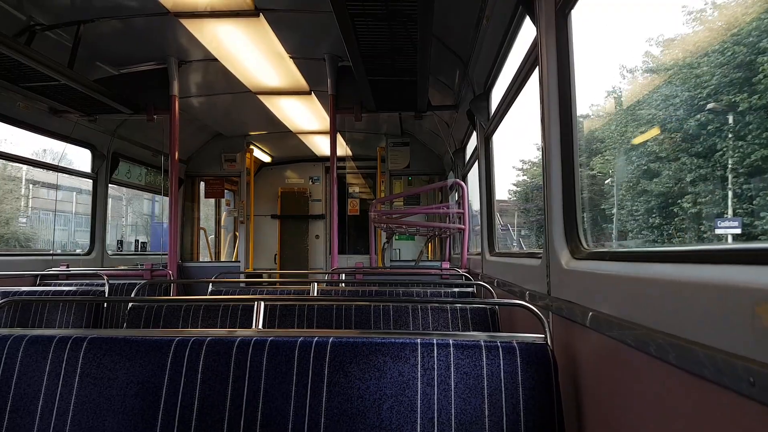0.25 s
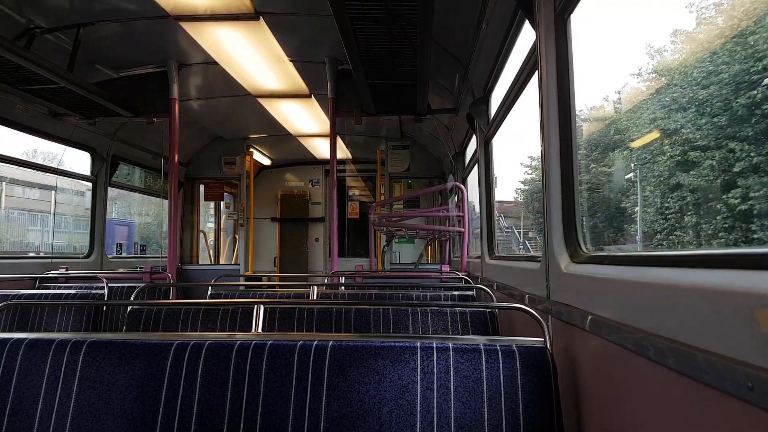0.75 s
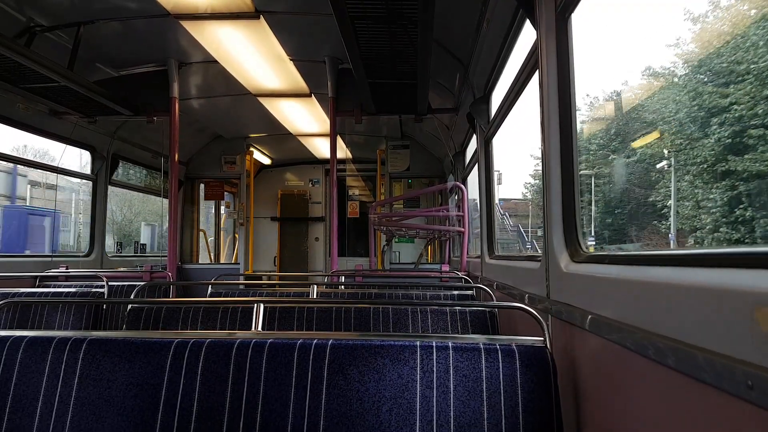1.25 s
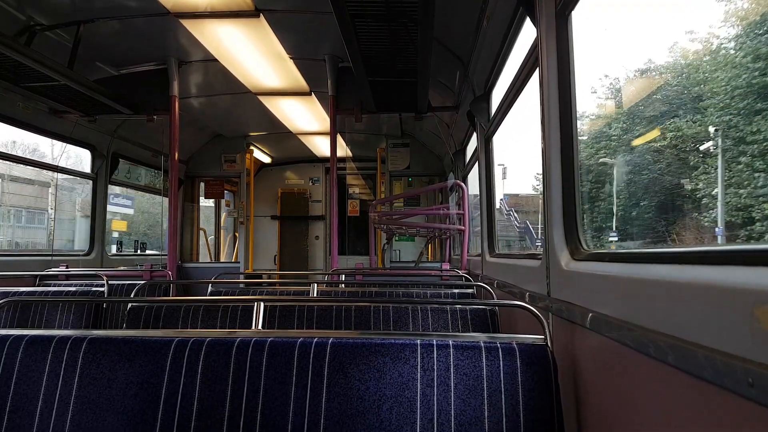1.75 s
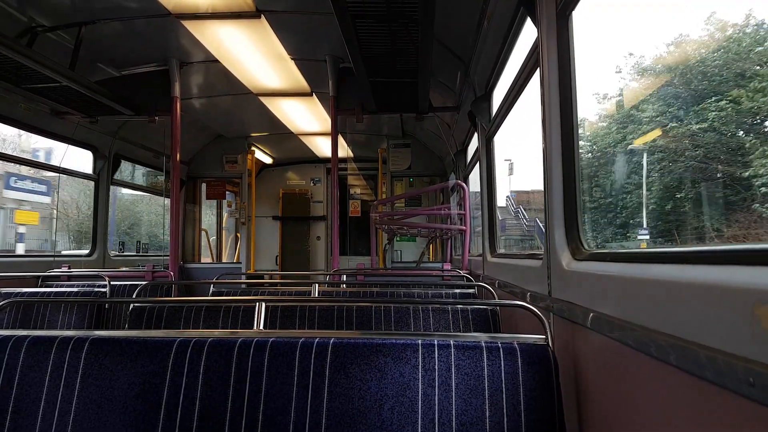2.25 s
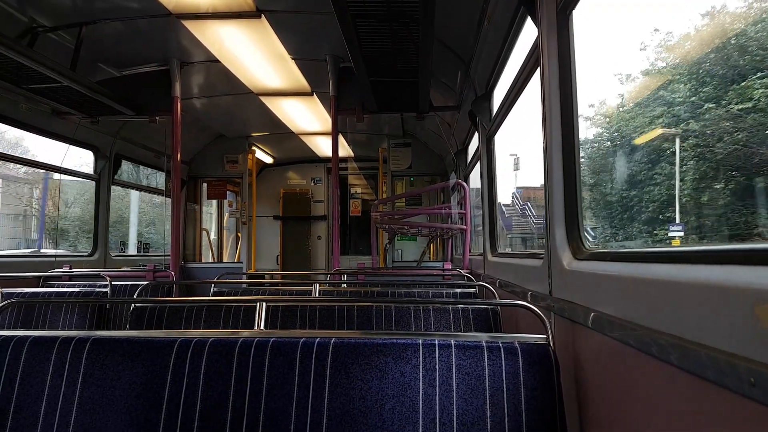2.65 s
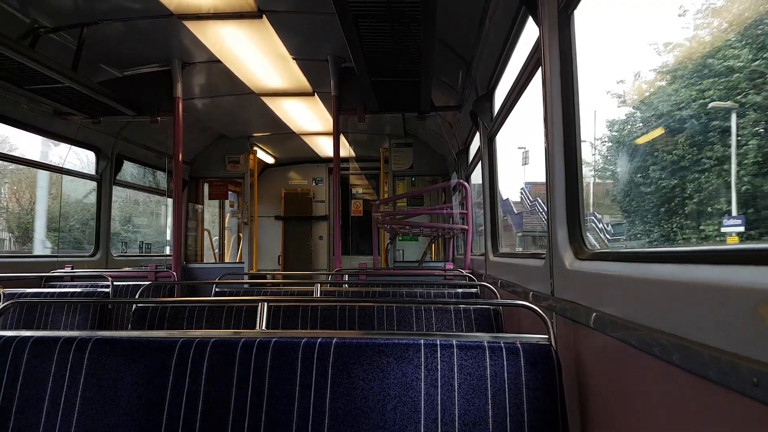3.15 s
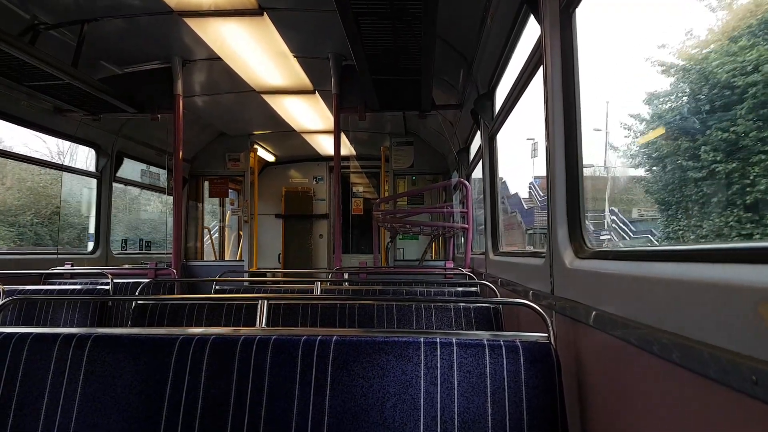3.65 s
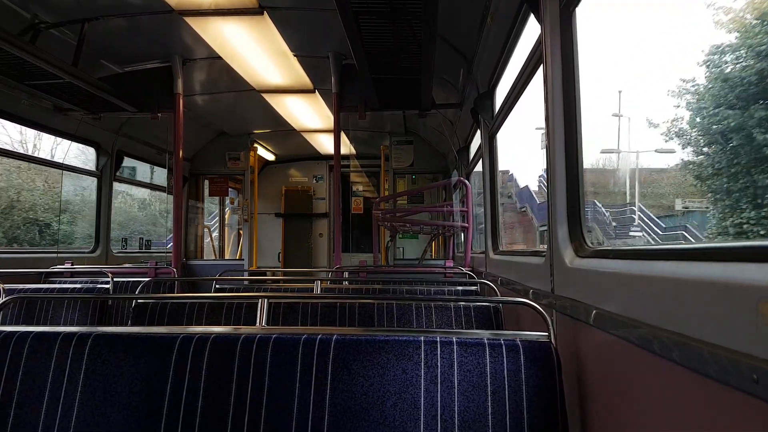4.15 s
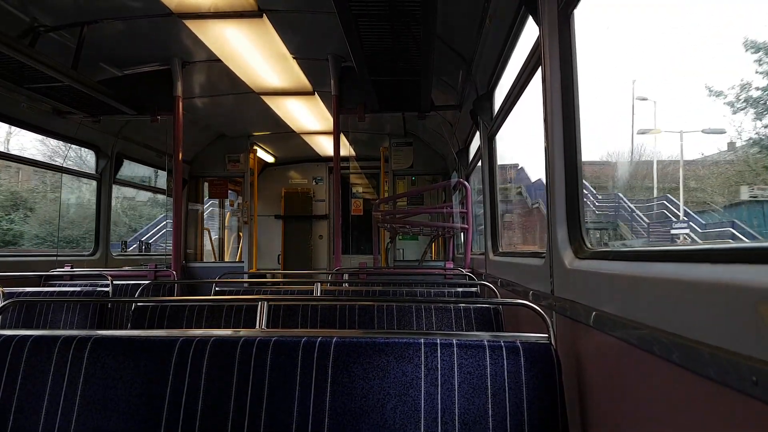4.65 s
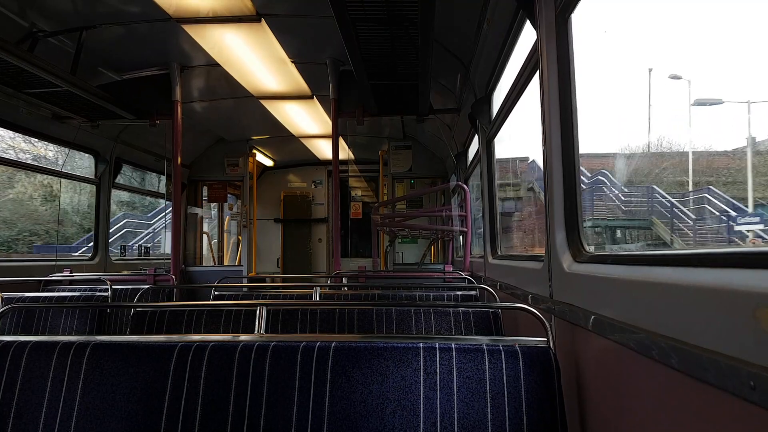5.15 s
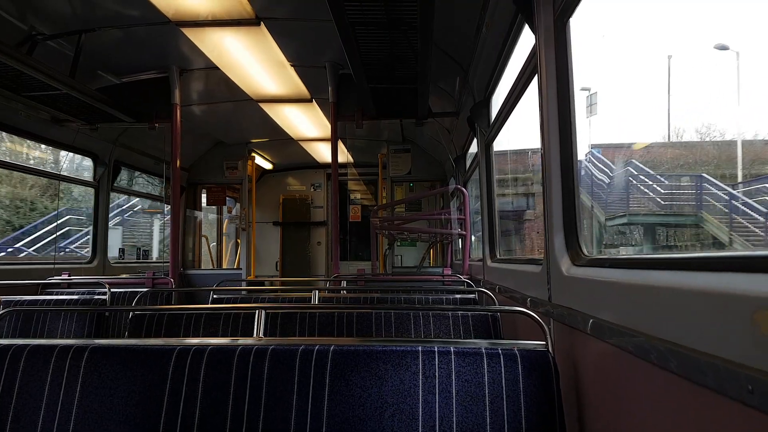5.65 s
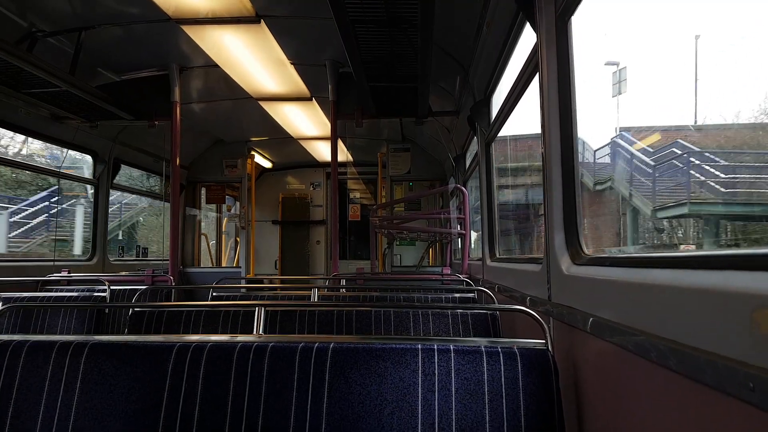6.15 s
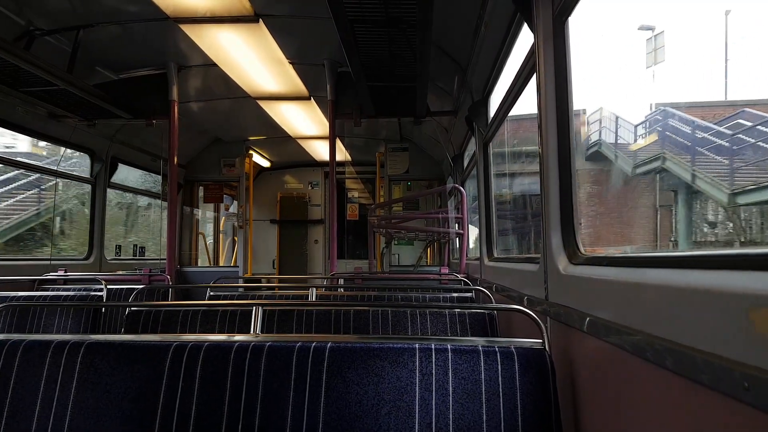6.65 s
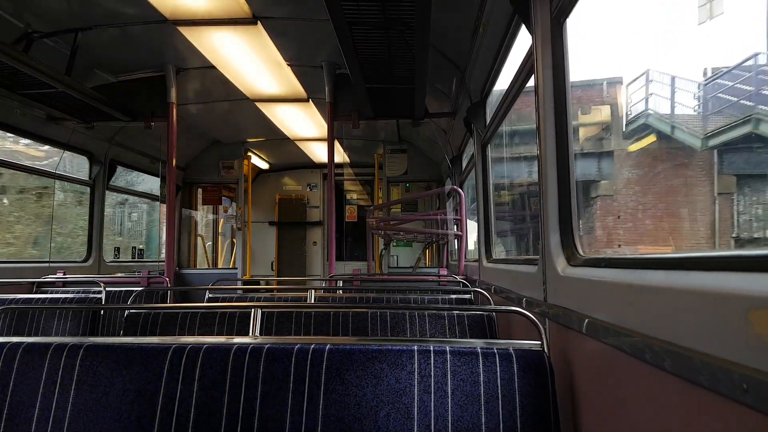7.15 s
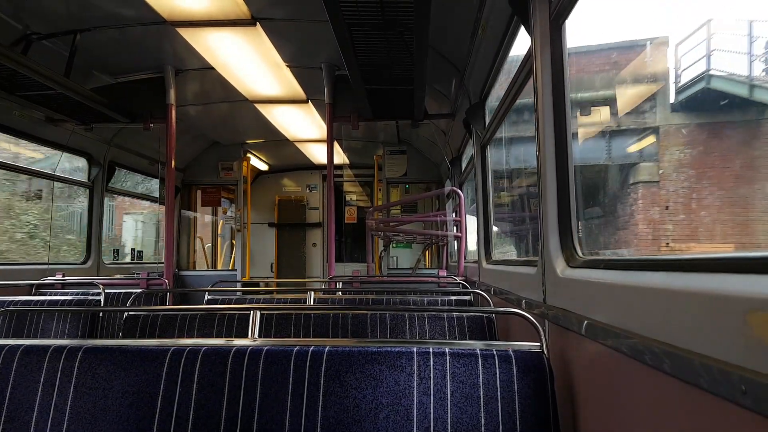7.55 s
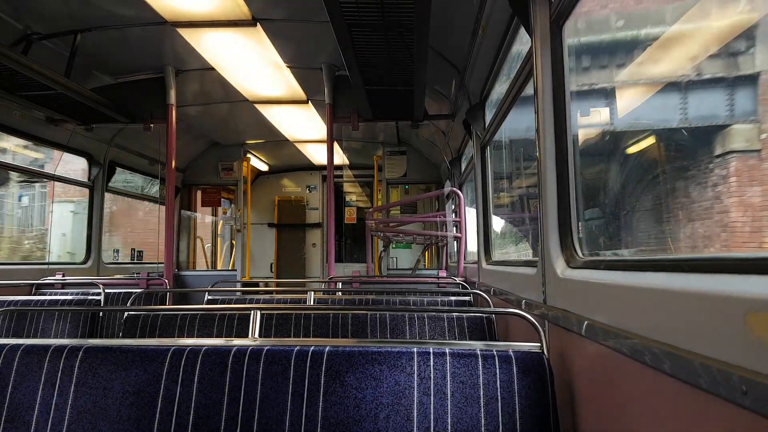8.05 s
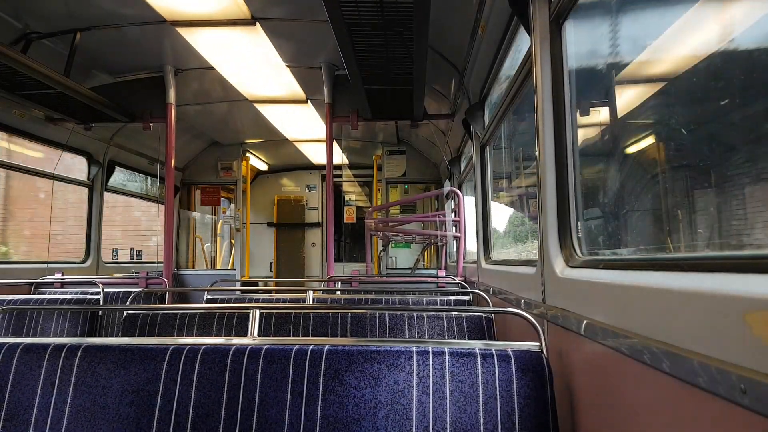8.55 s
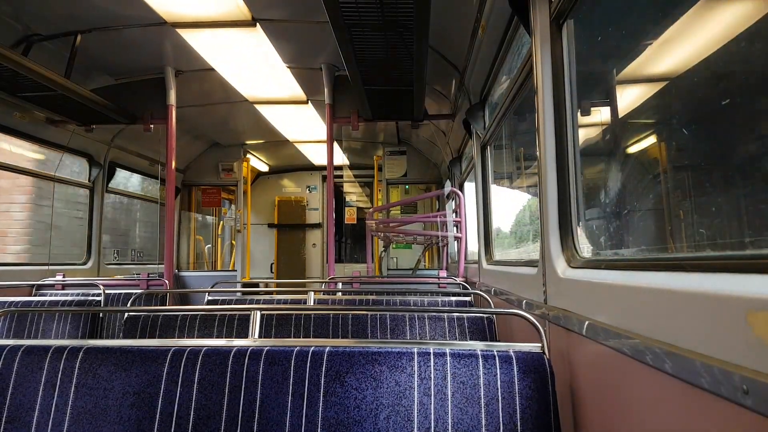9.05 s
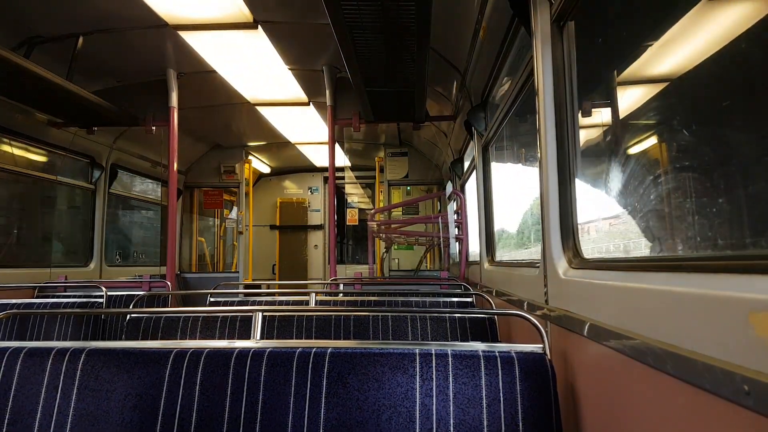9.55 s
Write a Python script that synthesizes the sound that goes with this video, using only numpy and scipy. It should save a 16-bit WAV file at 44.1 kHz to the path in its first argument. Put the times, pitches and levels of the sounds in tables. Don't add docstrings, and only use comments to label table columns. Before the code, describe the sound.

Inside an empty diesel railbus, heard in stereo from a seat. A deep engine boom near 85 Hz swells in during the first second and beats about nine times a second with another engine, above body rumble, fan hum and soft wheel roar. From 0.4 to 2 s a thin, high squeal pulses with the drive shaft. Small dips interrupt the boom around 2.3 and 2.6 s. At 3.3 s a sharp joint clank lands; engine pitch rises slightly and roar thickens. Light clatter at 4.2 s and a jolt at 4.55 s briefly sag the boom. Very high ticks run from 4 to 5.8 s, then upward chirps until 6.5 s, while panels whine. Clatter and louder roar come at 6.7 s. From 7.8 s, strongest after 8.5 s, a wheel flange sings in wavering beads near 2 kHz as the bridge encloses the train and roar grows to the end.

```python
import sys
import numpy as np
from scipy import signal
from scipy.io import wavfile
from scipy.ndimage import uniform_filter1d

SR = 44100
rng = np.random.default_rng(int(sys.argv[2]) if len(sys.argv) > 2 else 0)


def store_pcm(level_fs):
    pcm = np.round(np.clip(level_fs, -1, 1) * 32767).astype(np.int16)
    wavfile.write(sys.argv[1], SR, np.atleast_2d(pcm).T)


def convert_level_to_amplitude(level_db):
    exponent = np.asarray(level_db, float) / 20
    return 10 ** exponent


N = 431738


def clock():
    return np.arange(N) / SR


def read(points, hz):
    f, value = np.transpose(points)
    return np.interp(np.log(hz + 1), np.log(f + 1), value)


def curves(rows):
    s, *columns = np.transpose(rows)
    return [np.interp(clock(), s, column) for column in columns]


def evened(x):
    return x / np.sqrt(np.mean(np.abs(x) ** 2) + 1e-20)


def drift(rate):
    steps = rng.standard_normal(int(N / SR * 40) + 8)
    smooth = signal.lfilter([1], [1, -np.exp(-rate / 7)], steps)
    return evened(np.interp(clock() * 40, np.arange(len(steps)), smooth))


def swell(start, end, rise, fall, db=0):
    t = clock()
    fade_in = np.clip((t - start) / rise, 0, 1)
    fade_out = np.clip((end - t) / fall, 0, 1)
    return convert_level_to_amplitude(db) * (fade_in * fade_out) ** 1.4


def bells(rows, height=lambda v: v):
    return sum(height(v) * np.exp(-.5 * ((clock() - s) / w) ** 2) for s, v, w in rows)


def panned(x, pan_db):
    return x * convert_level_to_amplitude(np.multiply.outer([.5, -.5], pan_db * np.ones(N)))


def fuzzy(hz, width):
    r = np.exp(-np.pi * width / SR)
    z = rng.standard_normal((2, N)) + 1j * rng.standard_normal((2, N))
    z = signal.lfilter([1], [1, -2 * r, r * r], z)
    carrier = np.exp(2j * np.pi * np.cumsum(hz * np.ones(N)) / SR)
    return evened((z * carrier).real)


def wash(spectrum, size, patchy_db, flicker_db):
    # frequency in Hz, left-right likeness from -1 to 1.
    likeness = [(25, .97), (60, .997), (140, .99), (210, .97), (330, .7), (500, .55), (770, .36),
                (1200, -.14), (1800, -.15), (2700, 0), (15700, 0)]
    # frequency in Hz, left minus right in dB.
    lean = [(60, 1.5), (110, 1.5), (200, 0.5), (380, 0.0), (700, 1.5), (1290, 1.0), (2380, 0.5),
            (4400, 0.5), (8120, -1.0), (15000, 1.5)]
    frames, hz = 4 * N // size + 5, np.fft.rfftfreq(size, 1 / SR)
    a, b, c, d, patches = rng.standard_normal((frames, len(hz), 5)).T
    patches = uniform_filter1d(patches, size=10, axis=0)
    patches = evened(uniform_filter1d(patches, size=12, axis=1))
    flicker = evened(uniform_filter1d(rng.standard_normal(frames), size=5))
    same = np.clip(read(likeness, hz), -1, 1)[:, None]
    left = a + 1j * b
    right = same * left + np.sqrt(1 - same ** 2) * (c + 1j * d)
    f, _ = np.transpose(spectrum)
    level_db = read(spectrum, hz) - 60 * ((hz < f[0]) | (hz > f[-1]))
    z = np.array([left, right]) * convert_level_to_amplitude(level_db[:, None] + patchy_db * patches + flicker_db * flicker)
    z *= convert_level_to_amplitude(np.multiply.outer([.5, -.5], read(lean, hz)))[..., None]
    return evened(signal.istft(z, nperseg=size, noverlap=size * 3 // 4)[1][:, :N])


def shaft_turns():
    # time in seconds, speed in turns per second.
    shaft_speed = [(0.0, 7.88), (1.2, 8.62), (2.8, 10.44), (4.4, 11.56), (5.2, 12.47), (6.0, 13.26),
                   (7.0, 14.8), (8.0, 15.13), (9.0, 16.07), (9.79, 16.04)]
    return np.cumsum(curves(shaft_speed)[0]) / SR + .037


def touches(lobes):
    u = shaft_turns()
    return sum(g * np.exp(-.5 * (((u - at + .5) % 1 - .5) / w) ** 2) for at, w, g in lobes)


def struck(lobes, spread_db):
    u, out = shaft_turns(), 0
    for at, w, g in lobes:
        force = convert_level_to_amplitude(spread_db * rng.standard_normal(200))[(u - at + 1).astype(int)]
        since = (u - at) % 1
        out = out + g * force * (1 - np.exp(-since / 0.01)) * np.exp(-since / w)
    return out


def engines():
    # time in seconds, near firing rate in Hz, far firing rate in Hz.
    firing = [(0.0, 82.56, 90.0), (0.3, 84.84, 92.86), (0.7, 85.83, 94.8), (1.2, 86.71, 95.58),
              (2.0, 86.54, 95.63), (2.7, 86.48, 95.47), (3.05, 86.01, 95.12), (3.3, 87.33, 96.95),
              (3.6, 89.98, 99.48), (3.9, 91.37, 99.83), (4.3, 92.06, 99.78), (5.0, 92.1, 99.79),
              (5.8, 91.85, 99.58), (6.6, 91.61, 99.58), (7.4, 91.63, 99.38), (8.2, 91.44, 99.4),
              (9.0, 91.21, 99.17), (9.79, 91.23, 99.17)]
    start_rad = (1.5, 4.75)
    # sixths of the firing rate, level re firing tone in dB, unsteadiness in dB.
    orders = [(3, -33, -0.5), (4, -29.5, 2.5), (5, -23.5, 1.5), (7, -32.5, 1.5), (9, -31.5, 6),
              (12, -28, 2)]
    # time in seconds, depth in dB, half length in seconds.
    sags = [
        (2.29, 3, 0.022),
        (2.613, 4.5, 0.022),
        (4.565, 7.5, 0.022),
        (8.53, 7.5, 0.005),
    ]
    t = clock()
    near, far = (2 * np.pi * np.cumsum(hz) / SR + p for hz, p in zip(curves(firing), start_rad))
    near_db = -11 - 9 * np.exp(-t / 0.4) - bells(sags)
    far_db = -22.5 - .4 * t
    boom = convert_level_to_amplitude(near_db + .6 * drift(4)) * np.cos(near)
    boom += convert_level_to_amplitude(far_db + 1.3 * drift(3)) * np.cos(far)
    for sixths, db, wander_db in orders:
        level = convert_level_to_amplitude(near_db + db + wander_db * drift(3.6))
        boom += level * np.cos(sixths * near / 6 + 0.99 * drift(1.0))
    boom -= convert_level_to_amplitude(near_db - 35.5 + 2.0 * drift(2)) * np.cos(3 * near)
    late = np.r_[np.full(10, boom[0]), boom[:-10]]
    return np.sqrt(2) * panned(np.array([late, boom]), 1.7)


def body_rumble(effort_db):
    # frequency in Hz, level in dB per Hz.
    rumble = [(18, -17), (30, -8), (45, -5), (56, -7), (70, -1.5), (88, -4), (105, -2.5), (140, 0),
              (200, -5), (280, -13), (400, -30)]
    return convert_level_to_amplitude(-28.5 + 0.54 * effort_db) * wash(rumble, size=4096, patchy_db=0.8, flicker_db=1.3)


def wheel_roar(effort_db, gusts_db):
    # frequency in Hz, level in dB per Hz.
    roar = [(250, -9.5), (420, -0.5), (650, -3.5), (1050, -3), (1350, -6.5), (2000, -9), (3000, -18),
            (4600, -27.5), (5200, -46)]
    knocks = [(.82, 0.041, 1)]
    knock_db = 1.2 * swell(2.6, 11, .5, .5) * touches(knocks)
    level_db = -38 + effort_db + 0.21 * gusts_db + knock_db
    return convert_level_to_amplitude(level_db) * wash(roar, size=512, patchy_db=0.55, flicker_db=0.53)


def air_rush(effort_db, gusts_db):
    # frequency in Hz, level in dB per Hz.
    rush = [(2500, -12.5), (4000, 1.5), (5200, -3.5), (8200, -7.5), (8800, -13), (12000, -14), (13400, -16),
            (15700, -21.5)]
    pulses = [(.45, 0.04, 0.93), (.96, 0.054, .7)]
    level_db = -57.5 + 0.55 * effort_db + 0.4442 * clock() + .6 * gusts_db
    level_db = level_db + 1.8 * touches(pulses)
    return convert_level_to_amplitude(level_db) * wash(rush, size=512, patchy_db=-0.1, flicker_db=0.54)


def drone():
    # frequency in Hz, level in dB per Hz.
    machinery = [(180, -28.5), (260, -2.5), (420, -13.5), (620, -9.5), (800, -26.5), (1040, -14),
                 (1300, -21), (2100, -24.5), (3500, -32.5), (4700, -43.5), (8200, -50), (8900, -62.5),
                 (13000, -57), (15700, -63)]
    return convert_level_to_amplitude(-35.5) * wash(machinery, size=1024, patchy_db=-0.27, flicker_db=-0.16)


def running():
    # time in seconds, rise over the start in dB.
    effort = [(0, -0.5), (3.25, 1.2), (3.5, 2.5), (3.62, 4.5), (4.3, 5.5), (4.6, 4), (5.45, 4.5),
              (6.25, 5.5), (6.65, 8), (6.85, 7.5), (7.1, 5.5), (7.6, 5.5), (7.7, 4), (8.4, 4.5), (8.83, 6),
              (9.79, 8.5)]
    effort_db, gusts_db = curves(effort)[0], drift(8.8)
    return body_rumble(effort_db) + drone() + wheel_roar(effort_db, gusts_db) + air_rush(effort_db, gusts_db)


def flange():
    # time in seconds, level in dB, half length in seconds.
    beads = [(7.82, -46, .04), (8.11, -47, 0.022), (8.36, -43, .05), (8.51, -35.5, 0.013),
             (8.595, -34, .017), (8.75, -35, 0.016), (8.89, -41, .03), (9.05, -35.5, .025),
             (9.16, -39.5, 0.017), (9.3, -36.5, .03), (9.42, -43, .03), (9.76, -44, 0.022)]
    note_hz = 1950
    turn = 2 * np.pi * np.cumsum(note_hz + 15 * drift(14)) / SR
    note = np.array([np.cos(turn), np.cos(turn + 1.7)]) + .45 * fuzzy(note_hz, 150)
    bed = swell(7.5, 12, 0.3, 0.37, db=-45.5)
    return panned((bed + bells(beads, convert_level_to_amplitude)) * note, 1.5)


def shaft_part(spells, sound, lean_db):
    return panned(sum(swell(*row) for row in spells) * evened(sound), lean_db)


def shaft_squeal():
    # frequency in Hz, width in Hz, level in dB.
    squeal_notes = [(8565, 110, 0), (8735, 45, -7)]
    presses = [(.39, 0.068, 1), (.7, 0.055, 0.3), (.92, 0.079, 0.39)]
    # start, end, rise and fall in seconds, level in dB.
    spells = [
        (.35, 2.03, 0.0285, .05, -64.5),
        (.42, 2.07, .4, 0.42, -54.5),
    ]
    squeal = sum(convert_level_to_amplitude(db) * fuzzy(hz, w) for hz, w, db in squeal_notes)
    return shaft_part(spells, squeal * (0.65 + touches(presses)), lean_db=-3)


def shaft_ticks():
    hits = [(.4, .12, 1), (.91, .12, .8)]
    # start, end, rise and fall in seconds, level in dB.
    spells = [
        (3.92, 4.0, .02, .04, -63.5),
        (4.04, 5.6, .08, .7, -62),
        (5.48, 5.82, .04, .1, -63.5),
        (3.95, 11, .1, .1, -70.5),
    ]
    ring = fuzzy(12850, 400) + .8 * fuzzy(13450, 450) + .6 * fuzzy(14150, 450)
    ring = ring + .7 * fuzzy(11500, 2500) + .4 * fuzzy(15200, 1200)
    return shaft_part(spells, ring * (.1 + struck(hits, 3)), lean_db=1)


def shaft_chirps():
    # start, end, rise and fall in seconds, level in dB.
    spells = [
        (5.64, 6.45, .06, .22, -57.5),
        (5.45, 6.65, .15, .2, -64),
    ]
    since = (shaft_turns() - .68) % 1
    glide_hz = 4950 + 150 * drift(8) + 1250 * np.minimum(since / .22, 1)
    chirp = fuzzy(glide_hz, 400) * struck([(.68, .2, 1)], 1.5)
    ring = fuzzy(5800, 800) * (.1 + struck([(.8, .3, .35)], 1))
    return shaft_part(spells, chirp + ring, lean_db=-3)


def joints():
    # time in seconds, clank, clatter and rattle levels in dB, decay in seconds.
    jolts = [
        (3.337, -37.5, -45.5, -48, .004),
        (3.346, -56, -58, -58.5, .025),
        (4.184, -52, -48, -59, .007),
        (4.195, -53.5, -55.5, -61, .02),
        (4.534, -46, -56.5, -62, .008),
        (6.061, -57, -61.5, -65.5, .03),
        (6.712, -58, -50, -62.5, .03),
        (6.74, -53, -49, -61.5, .035),
    ]
    clank = np.cos(2 * np.pi * 3550 * clock()) + .6 * fuzzy(3500, 900)
    clatter = fuzzy(7000, 2800)
    rattle = fuzzy(11400, 1000) + .7 * fuzzy(14000, 3500)
    out = np.zeros((2, N))
    for s, clank_db, clatter_db, rattle_db, decay_s in jolts:
        u = np.maximum(clock() - s, 0)
        shake = convert_level_to_amplitude(clank_db) * clank + convert_level_to_amplitude(clatter_db) * clatter + convert_level_to_amplitude(rattle_db) * rattle
        out += (1 - np.exp(-u / .001)) * np.exp(-u / decay_s) * shake
    return out


def fan_hum():
    # harmonic number, level in dB, left phase lead in radians, left minus right in dB.
    harmonics = [(1, -1, -0.5, -1.8), (2, -13.5, -2.1, 1.5), (3, -14.5, -3, 1.5)]
    # time in seconds, depth in dB, half length in seconds.
    slips = [
        (0, 3, 0.43),
        (4.65, 3, 0.27),
        (5.9, 2, 0.09),
        (6.95, 5, .33),
        (8.85, 8, 0.22),
        (9.79, 1.5, 0.24),
    ]
    # start in seconds, end in seconds, lift in dB.
    octave_swells = [
        (4.4, 5.56, 4),
        (4.5, 8.8, 5),
    ]
    t, slip_db = clock(), bells(slips)
    fan_db = -34 - 0.06 * t - slip_db
    apart = 1.3 + 0.46 * slip_db
    octave_db = sum(db * swell(s, e, 0.32, .4) for s, e, db in octave_swells)
    turn = 2 * np.pi * np.cumsum(349.7 + .3 * t + .7 * drift(5.1)) / SR
    hum = 0
    for k, db, lead, pan_db in harmonics:
        ears = [np.cos(k * turn + p + .35 * drift(3)) * convert_level_to_amplitude(1.6 * drift(3)) for p in (lead + apart, 0)]
        level_db = fan_db + db + (k == 2) * octave_db
        hum = hum + panned(convert_level_to_amplitude(level_db) * np.array(ears), pan_db)
    return hum


def panel_whines():
    # frequency in Hz, width in Hz, start in seconds, end in seconds, level in dB.
    panels = [(624, 6.4, -1.5, 5.3, -53), (1140, 5.6, 2.3, 4.4, -57), (551, 8, 5, 5.7, -49),
              (565, 7, 5.5, 8.1, -44), (570, 26, 10, 11, -51.5), (1322, 8, 1, 6.9, -54),
              (4160, 60, .8, 3.6, -69.5), (1546, 9, 3.5, 4.4, -52.5), (1550, 6.4, 4.55, 6.6, -51),
              (1570, 12, 9, 11, -57), (8060, 86, -2, 11, -78), (4440, 190, -0.5, 3.6, -69.5),
              (4500, 130, 3.4, 4.3, -58.5), (4590, 160, 3.5, 8.2, -58), (4500, 190, 6.5, 11, -63.5),
              (13300, 120, 2.5, 11, -79), (7300, 1600, 6, 8.2, -64)]
    return sum(swell(s, e, 0.22, 0.41, db) * fuzzy(hz, w) for hz, w, s, e, db in panels)


def scene():
    shaft = shaft_squeal() + shaft_ticks() + shaft_chirps()
    return engines() + running() + flange() + shaft + joints() + fan_hum() + panel_whines()


def band_limit(x):
    return signal.sosfilt(signal.butter(12, 15710, fs=SR, output="sos"), x)


def record(dry):
    power_db = 10 * np.log10(abs(uniform_filter1d((dry ** 2).mean(0), size=700)) + 1e-9)
    over_db = uniform_filter1d(np.maximum(power_db + 13, 0), size=400)
    limited = dry * convert_level_to_amplitude(0.58 - 0.23 * over_db)
    ceiling = 1.05
    return band_limit(ceiling * np.tanh(limited / ceiling))


dry = scene()
out = record(dry)
store_pcm(out)
```